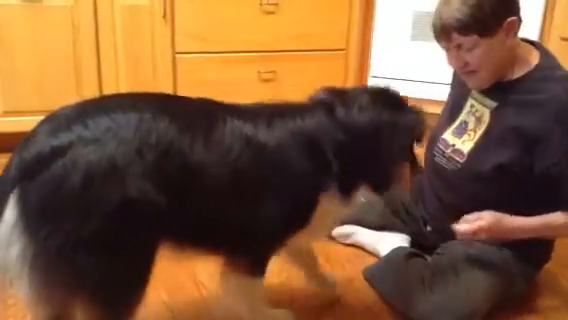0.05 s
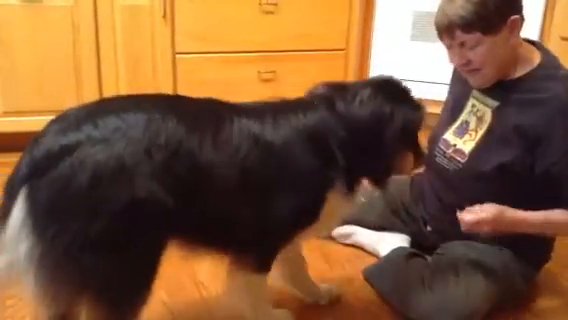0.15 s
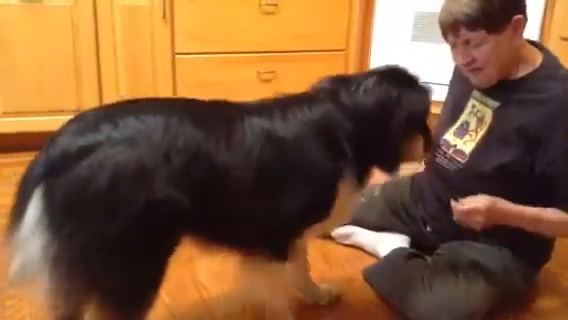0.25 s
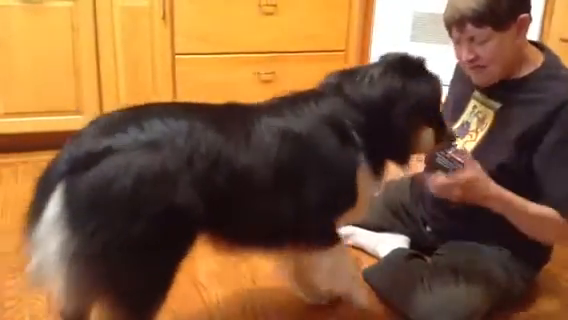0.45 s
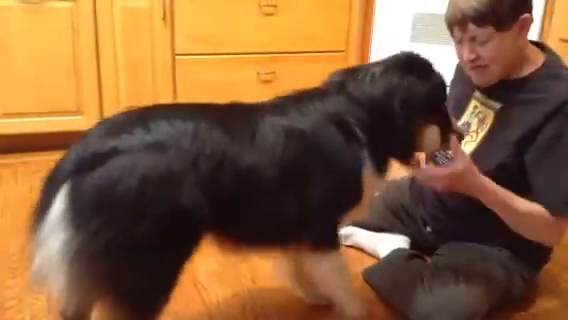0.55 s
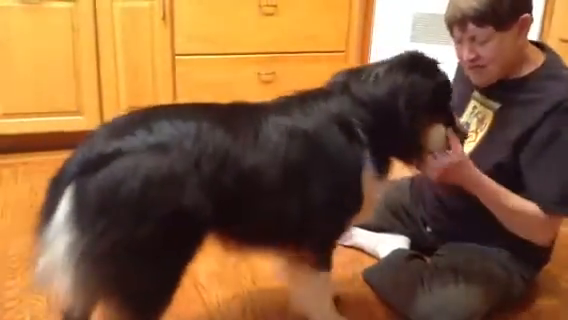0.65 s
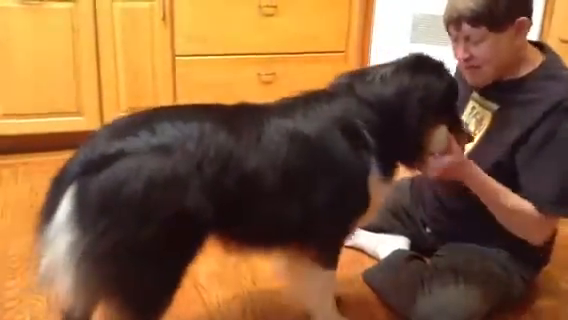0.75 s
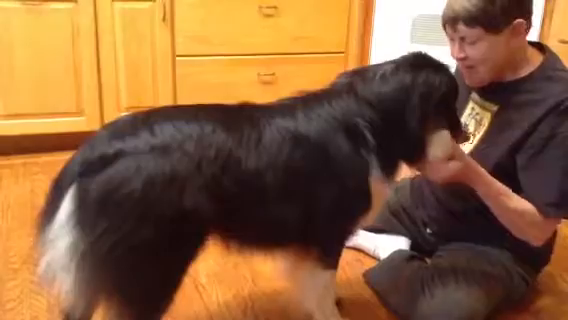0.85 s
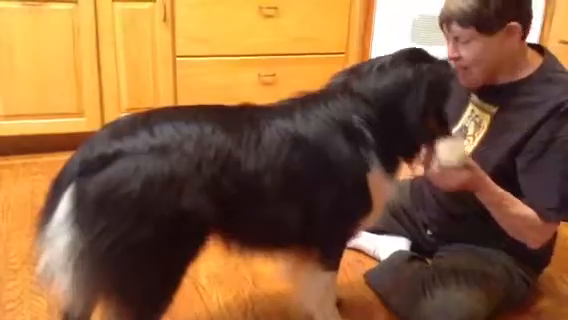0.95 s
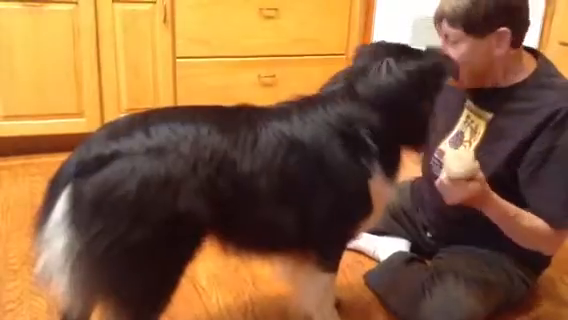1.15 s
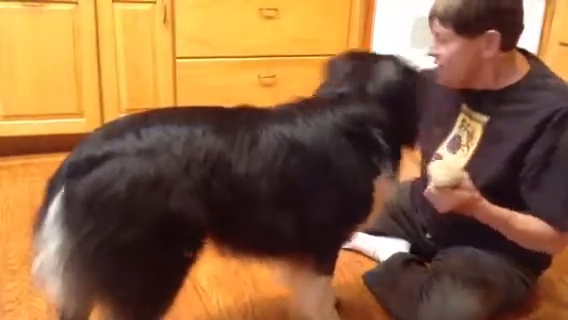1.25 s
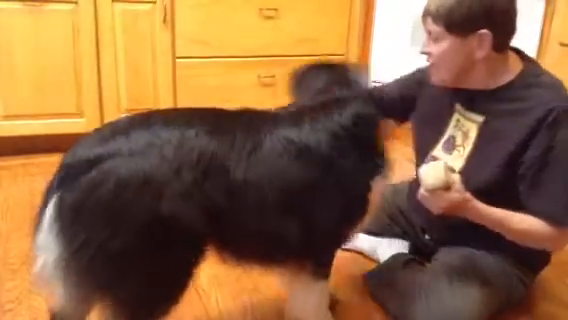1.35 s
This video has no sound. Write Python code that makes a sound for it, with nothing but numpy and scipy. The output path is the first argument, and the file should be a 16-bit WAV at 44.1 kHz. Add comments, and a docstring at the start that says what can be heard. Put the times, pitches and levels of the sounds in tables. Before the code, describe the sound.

Two crisp snaps ring out as a dog clicker is pressed and released in a quiet kitchen. Then claws tap the wooden floor and paws pad softly, with faint rustling and a low appliance hum, all heard from one spot.

```python
"""Training clicker in a quiet kitchen

One microphone in the room. A clicker is pressed and released: its steel tongue snaps twice,
and the floor and cabinets echo it. A dog steps about on the wooden boards, one paw landing
with a sharp tap of claws and a short skid. Clothes and fur rustle over an appliance's hum."""
import sys
import numpy as np
from scipy import signal
from scipy.fft import rfft, irfft, next_fast_len
from scipy.io import wavfile

SR = 44100
rng = np.random.default_rng(int(sys.argv[2]) if len(sys.argv) > 2 else 0)


def to_wav(sig):
    """Store sig (one row per channel, or 1-D mono) as 16-bit WAV at the path in sys.argv[1].

    Samples outside -1..1 are clipped; the rate is SR.
    """
    pcm = np.clip(np.atleast_2d(sig), -1, 1) * 32767
    pcm = np.round(pcm).astype(np.int16)
    wavfile.write(sys.argv[1], SR, pcm.T)  # frames by channels


N = 61739
T = np.arange(N) / SR

# the tongue's resonances as it buckles and as it springs back (frequency [Hz], width [Hz], peak [dB])
PRESS_RESONANCES = [(1373, 99, -15), (2632, 380, -12.5), (4335, 600, -11.5), (4950, 490, -14.5),
                    (6940, 500, -6.5), (7430, 450, 1), (8140, 690, -0.5), (8870, 500, -4), (9630, 550, 3),
                    (10430, 350, 2), (11400, 410, -2), (11800, 700, -8), (12990, 400, -0.5),
                    (14260, 1100, -8.5)]
RELEASE_RESONANCES = [(1737, 660, -19.5), (2505, 240, -7.5), (3870, 410, -7.5), (4350, 300, -10),
                      (5230, 420, -6.5), (6515, 220, -4), (7300, 350, 1.5), (7900, 550, -0.5),
                      (7830, 720, 1), (9900, 1000, -5.5), (11160, 900, -3.5), (12700, 860, -7.5),
                      (12800, 1000, -7), (14540, 1100, -7)]
# the broadband crack under those resonances (frequency [Hz], level [dB])
PRESS_CRACK_SPECTRUM = [(100, -34.5), (260, -28), (450, -38.5), (900, -30.5), (2000, -25.5), (3400, -21),
                        (6000, -19.5), (9000, -8.5), (15000, -16)]
RELEASE_CRACK_SPECTRUM = [(100, -50), (500, -26.5), (1100, -29), (2150, -24), (3150, -39.5), (4200, -15),
                          (9000, -7), (15000, -12.5)]


def clicker(resonances, crack, at_s, level_db, room_db):
    """The tongue flips: a sharp crack rings its heavily damped resonances for a few milliseconds."""
    hz = np.linspace(SR / 1000, SR / 2, SR // 40)
    ring_power = sum((undb(peak) / (1 + 2 * ((hz - centre) / width) ** 2)) ** 2
                     for centre, width, peak in resonances)
    power = undb(level_at(crack, hz)) ** 2 + ring_power
    spectrum = np.column_stack([hz, 10 * np.log10(power)])
    snap = burst(spectrum, decay_s=.001)
    return undb(level_db) * delay(kitchen(snap, room_db), at_s)


# claws striking the boards (time [s], level [dB])
CLAW_TAPS = [(0.6449, -15.5), (0.6557, -27), (0.6599, -28.5), (1.01, -54.5), (1.23, -43), (1.387, -31.5)]
# the sound of one tap (frequency [Hz], level [dB])
CLAW_SPECTRUM = [(200, -20.5), (550, -22.5), (1050, 2), (1550, -2), (2400, -2.5), (4000, -3), (5150, 3.5),
                 (6500, -1.5), (8800, -7), (12000, -2), (15000, -11.5)]


def claws():
    """Hard claws tick on the wooden floor."""
    taps = sum(undb(db) * delay(burst(CLAW_SPECTRUM, decay_s=.00078), s) for s, db in CLAW_TAPS)
    return kitchen(taps, room_db=2.5, echo_db=-8.5)


# soft footfalls on the boards (time [s], level [dB])
PAW_STEPS = [(.133, -27.5), (.651, -24.5), (1.207, -36), (1.328, -32)]
# the sound of one footfall (frequency [Hz], level [dB])
PAW_SPECTRUM = [(50, -38.5), (130, -9.5), (250, 3), (400, -16), (620, -8.5), (1200, -23.5), (4000, -30),
                (12000, -45)]


def paws():
    """Soft pads land with a longer contact and a low thud."""
    thuds = sum(undb(db) * delay(burst(PAW_SPECTRUM, decay_s=.009), s) for s, db in PAW_STEPS)
    return kitchen(thuds, room_db=1, echo_db=-1.5)


# a pad sliding on wood (frequency [Hz], level [dB])
SCUFF_SPECTRUM = [(200, -39), (750, -22), (1050, 3.5), (1600, -1.5), (2300, -9), (5000, -25), (15000, -42)]


def skid(squeak_hz=3200):
    """The landing paw slides: a claw squeaks, then the pad scuffs."""
    squeak = swell(middle_s=.659, half_s=.002, level_db=-42) * np.sin(2 * np.pi * squeak_hz * T)
    scuff = swell(middle_s=.682, half_s=.0077, level_db=-50) * noise(SCUFF_SPECTRUM)
    return kitchen(squeak, room_db=-23, echo_db=-10) + kitchen(scuff, room_db=-3.5, echo_db=-11)


# brushes of cloth and fur, faint at the microphone (time [s], half length [s], level [dB])
BRUSHES = [(.0, 0.041, -59), (0.159, 0.044, -63), (0.911, 0.019, -64), (1.0, 0.018, -65.5),
           (1.357, .03, -63.5)]
# the sound of the brushing (frequency [Hz], level [dB])
RUSTLE_SPECTRUM = [(100, -12), (300, -2.5), (620, 2.5), (1500, -5), (3000, -2.5), (4800, -5.5),
                   (8000, -10.5), (15000, -15)]


def rustle(grain_db=2.5):
    """Cloth and fur brush in short, grainy swells of noise."""
    envelope = sum(swell(s, half_s, db) for s, half_s, db in BRUSHES)
    return envelope * noise(RUSTLE_SPECTRUM) * undb(grain_db * wander(rate_hz=300))


# steady tones of an appliance in the room (frequency [Hz], level [dB])
HUM_TONES = [(120, -79.5), (240, -74.5), (589, -76.5)]


def appliance_hum(waver_db=2.5):
    """An appliance hums, each tone wavering in level on its own."""
    hum = np.zeros(N)
    for hz, db in HUM_TONES:
        amplitude = np.sqrt(2) * undb(db - waver_db * wander(rate_hz=24))
        hum += amplitude * np.sin(2 * np.pi * (hz * T + rng.random()))
    return hum


# the kitchen's room tone (frequency [Hz], level [dB])
AIR_SPECTRUM = [(18, -67), (30, -39.5), (85, -27.5), (110, -8.5), (195, -6), (222, -2), (296, -4.5),
                (337, -2.5), (364, -10.5), (597, -4), (837, -11.5), (1600, -12.5), (2030, -17), (2990, -20),
                (15000, -24)]


def room_air(level_db=-63):
    """A low, even wash of air lies under everything."""
    return undb(level_db) * noise(AIR_SPECTRUM)


# reflections off floor and cabinets, reaching the microphone after the sound (delay [s], level [dB])
REFLECTIONS = [(.0015, -3.5), (.0052, -11), (.0079, -5), (.0091, -4.5), (0.0146, -9.5), (0.0158, -3.5),
               (0.024, -11)]
# the kitchen's reverberation (frequency [Hz], time to fall 60 dB [s])
REVERB_TIMES = [(150, .36), (1000, .44), (2600, 0.42), (5000, 0.42), (7800, 0.39), (11000, 0.3),
                (15000, 0.26)]


def kitchen(x, room_db, echo_db=0, smear_s=.00017, gap_s=.002, build_s=.0022):
    """Direct sound, reflections smeared by uneven surfaces, then a tail whose treble dies first."""
    early = sum(undb(db) * delay(unit(scatter(smear_s)), s) for s, db in REFLECTIONS)
    hz, t, cells = signal.stft(rng.standard_normal(N), SR, nperseg=256)
    decay = np.exp(-np.log(1000) * t / level_at(REVERB_TIMES, hz)[:, None])
    tail = signal.istft(cells * decay, SR)[1][:N]
    tail = delay(tail * (1 - np.exp(-T / build_s)), gap_s)
    response = undb(echo_db) * early + undb(room_db) * unit(tail)
    return x + signal.fftconvolve(x, response)[:N]


def undb(db):
    """Decibels to gain."""
    return 10 ** (np.asarray(db) / 20)


def unit(x):
    """Scale to an energy of one."""
    return x / np.sqrt(np.sum(x ** 2) + 1e-18)


def level_at(points, hz):
    """A table's value at hz, interpolated along a logarithmic frequency axis."""
    frequencies, values = np.array(points).T
    return np.interp(np.log(np.maximum(hz, 1)), np.log(frequencies), values)


def colour(x, spectrum):
    """Causal filter with the given (frequency [Hz], level [dB]) shape."""
    size = 2 * next_fast_len(N)
    gain = undb(level_at(spectrum, np.fft.rfftfreq(size, 1 / SR)))
    cepstrum = irfft(np.log(gain))
    cepstrum[1:size // 2] *= 2  # minimum phase: nothing rings ahead of a hit
    cepstrum[size // 2 + 1:] = 0
    return irfft(rfft(x, size) * np.exp(rfft(cepstrum)))[:N]


def noise(spectrum):
    """Coloured noise of rms one."""
    return unit(colour(rng.standard_normal(N), spectrum)) * np.sqrt(N)


def scatter(decay_s):
    """Quickly dying noise with an even spectrum."""
    bins = rfft(rng.standard_normal(N) * np.exp(-T / decay_s))
    return irfft(bins / np.abs(bins), N) * (T < T[-1] / 2)


def burst(spectrum, decay_s):
    """A brief contact with the given colour."""
    return unit(colour(scatter(decay_s), spectrum))


def swell(middle_s, half_s, level_db):
    """A bell-shaped rise and fall."""
    return undb(level_db) * np.exp(-((T - middle_s) / half_s) ** 2 / 2)


def delay(x, s):
    """The same sound s seconds later."""
    return np.concatenate([np.zeros(max(int(s * SR), 0)), x])[:N]


def wander(rate_hz):
    """A random drift with a spread near one."""
    return np.interp(T * rate_hz, np.arange(N), rng.standard_normal(N))


def scene():
    """Everything as heard from one spot in the kitchen, in mono."""
    press = clicker(PRESS_RESONANCES, PRESS_CRACK_SPECTRUM, at_s=.2248, level_db=5.5, room_db=5)
    release = clicker(RELEASE_RESONANCES, RELEASE_CRACK_SPECTRUM, at_s=.3629, level_db=5.5, room_db=4.5)
    dog = claws() + paws() + skid()
    return (press + release + dog + rustle() + appliance_hum() + room_air())[None]


def record(dry, bass_hz=90, top_hz=15150):
    """The microphone thins the deep bass and cuts the top."""
    low_cut = signal.butter(2, bass_hz, "high", fs=SR, output="sos")
    high_cut = signal.ellip(10, .2, 70, top_hz, fs=SR, output="sos")
    return signal.sosfilt(high_cut, signal.sosfilt(low_cut, dry))


dry = scene()
out = record(dry)
to_wav(out)
```